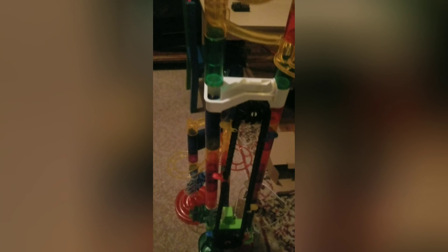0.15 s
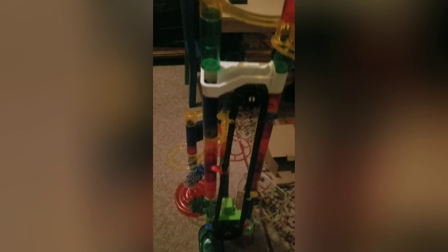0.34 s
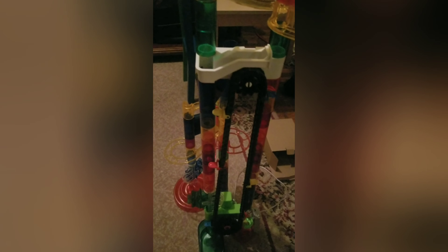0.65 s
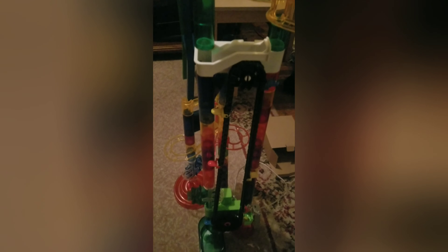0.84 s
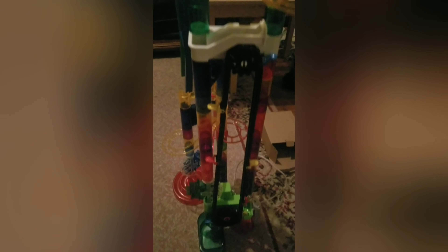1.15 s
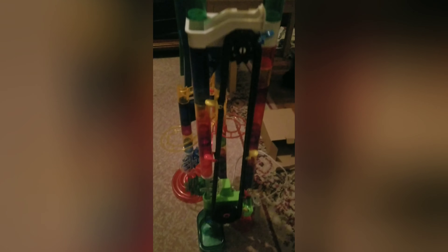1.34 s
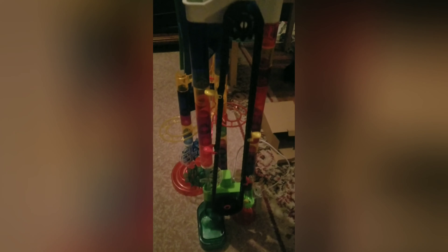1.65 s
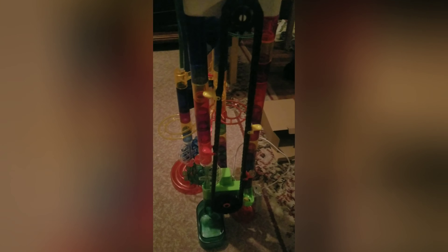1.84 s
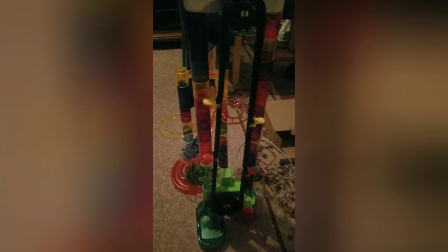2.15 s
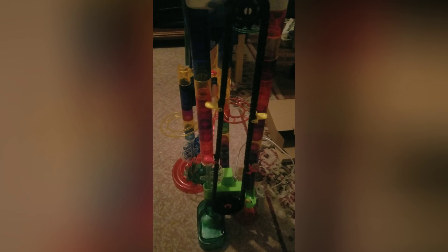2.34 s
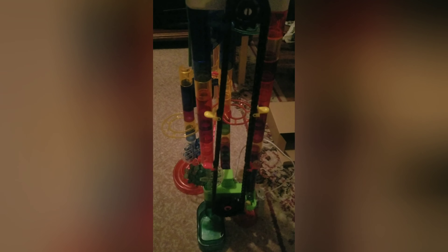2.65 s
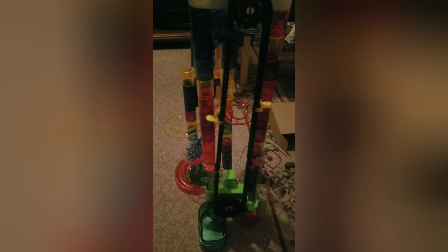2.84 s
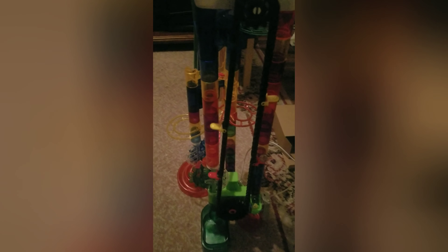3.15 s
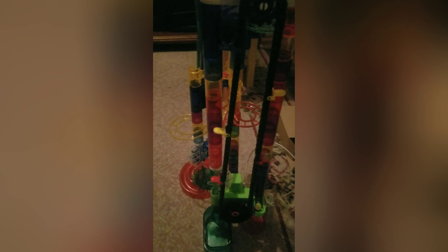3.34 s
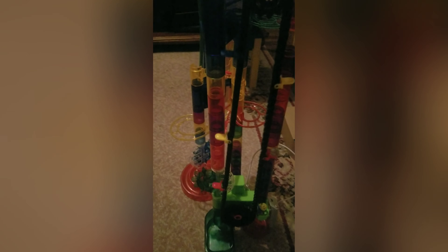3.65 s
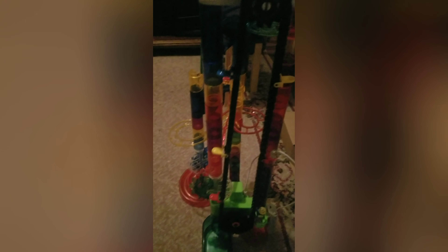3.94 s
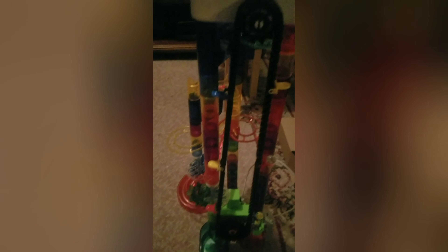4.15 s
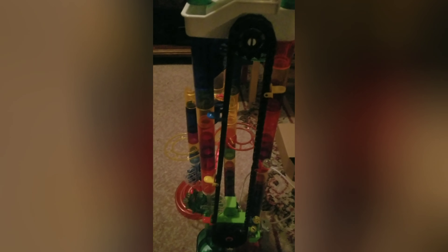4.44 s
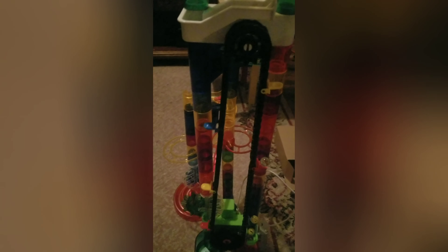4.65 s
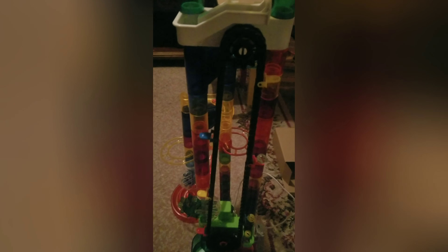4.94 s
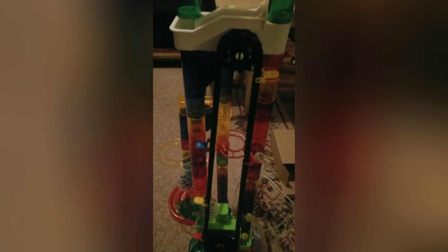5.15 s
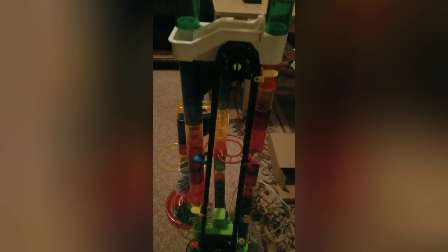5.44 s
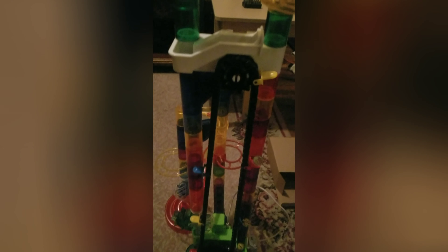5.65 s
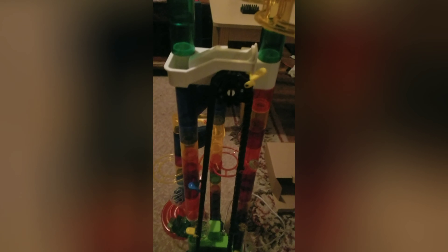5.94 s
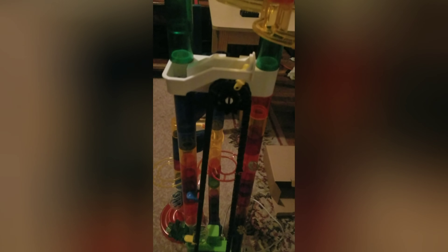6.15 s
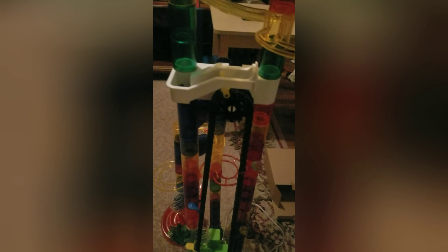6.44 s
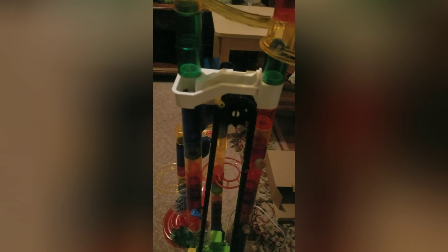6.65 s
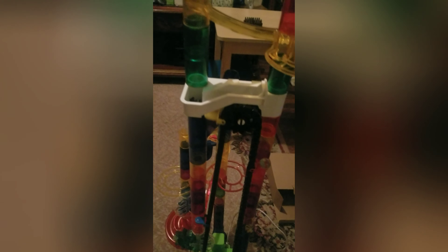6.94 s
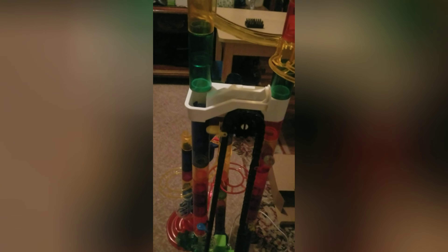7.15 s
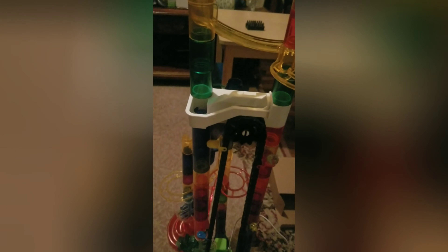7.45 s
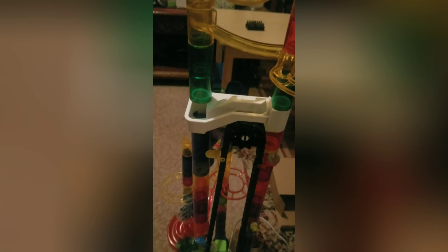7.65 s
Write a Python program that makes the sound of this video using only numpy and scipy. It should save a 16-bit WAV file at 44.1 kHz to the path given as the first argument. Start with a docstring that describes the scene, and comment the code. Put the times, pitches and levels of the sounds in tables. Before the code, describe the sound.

Marbles clatter and roll down a plastic toy tower in uneven bursts, with sharp bright clicks, close up, in a small room.

```python
"""Marbles drop and roll down a plastic toy tower, heard close through a hand-held microphone on the right.
Each knock is a burst of noise and short modes in three registers, followed by dying bounces and a jostle.
Between knocks, grains and noise make the rolling, lighter knocks tap the walls, gliding resonances circle
a funnel, high pips are marbles clicking together, and a chain lift ticks. Resonators ring the tower, echoes
and a noise tail make the room; low sine thuds of hand and stand, rumble, air and motor whirr lie beneath."""
import sys
import numpy as np
from scipy import signal
from scipy.fft import rfft, irfft
from scipy.io import wavfile

SR = 44100
rng = np.random.default_rng(int(sys.argv[2]) if len(sys.argv) > 2 else 0)


def bounce(signal):
    """Save signal as a 16-bit WAV file at the path given by the first command-line argument."""
    frames = np.transpose(np.atleast_2d(signal))
    limited = np.clip(frames, -1, 1)
    pcm = np.round(limited * 32767).astype(np.int16)
    wavfile.write(sys.argv[1], SR, pcm)


N = 343980
TIME = np.arange(N) / SR
RING = TIME[:3072]  # time axis of one short sound
ATTACK = 176  # samples over which a strike's level is set

# Marbles dropping onto plastic, levels before trims; the faint row at 4.648 s is instead a click of the chain
# lift, # a step ahead of its even run: # (time [s], hollow body [dB], clack [dB], bright tick [dB], decay time
# of the bounces [s])
MARBLE_DROPS = [(0.2054, -38, -33.0, -31.5, 0.024), (0.24, -25.5, -22.5, -24.5, 0.013),
                (0.2869, -29, -34, -32, 0.005), (0.314, -27, -25.0, -29.0, 0.013),
                (0.3792, -28.5, -37, -35, 0.0028), (0.429, -34, -38, -42, 0.065),
                (0.6801, -30.5, -24, -34.5, 0.0062), (0.723, -24, -21.5, -24.5, 0.018),
                (0.7884, -24, -17.5, -21.0, 0.0064), (0.8295, -28, -29, -31, 0.0044),
                (0.8415, -28.5, -26.0, -29, 0.011), (0.905, -31, -31.5, -42, 0.0027),
                (1.0284, -34, -34.5, -30, 0.0062), (1.1874, -28.5, -24.5, -26, 0.0035),
                (1.2286, -28.5, -25, -29.5, 0.0067), (1.306, -41, -38, -33.0, 0.019),
                (1.4012, -38.5, -28, -30.0, 0.018), (1.453, -29.5, -28, -27, 0.0031),
                (1.4877, -31, -32.5, -31.5, 0.004), (1.7706, -31, -26, -26.5, 0.024),
                (1.8313, -26.5, -21.0, -27, 0.0064), (1.902, -31.5, -25.5, -28, 0.02),
                (1.994, -25.5, -19.5, -24.5, 0.025), (2.0488, -29.5, -20, -25.5, 0.014),
                (2.1385, -28, -19.5, -23.5, 0.028), (2.163, -28.0, -23, -18.0, 0.02),
                (2.1853, -24, -26, -18, 0.004), (2.2376, -31, -25.5, -22, 0.039),
                (2.2831, -40, -24.0, -21, 0.0047), (2.3484, -25.5, -19, -17.5, 0.004),
                (2.3757, -28, -25, -21, 0.0036), (2.4078, -29, -23.5, -22.0, 0.0044),
                (2.482, -45, -31, -23.5, 0.0031), (2.532, -52, -46, -21.5, 0.0062),
                (2.5917, -32.0, -26.0, -19.5, 0.011), (2.6528, -33, -27.5, -23, 0.039),
                (2.7499, -27, -24, -27, 0.021), (2.7758, -26.5, -25.5, -22.0, 0.0081),
                (2.818, -32.5, -31.5, -28.5, 0.019), (2.9218, -27.0, -25, -24.5, 0.016),
                (3.0004, -33.5, -26.5, -29.5, 0.036), (3.043, -29.5, -26.5, -26.0, 0.0059),
                (3.1092, -27, -28.0, -26, 0.016), (3.1892, -33, -30, -29, 0.014),
                (3.207, -29.5, -28, -27.0, 0.0042), (3.253, -41, -34, -22, 0.0045),
                (3.3041, -29.5, -30, -24, 0.0055), (3.3412, -28, -23.5, -23, 0.018),
                (3.4397, -33, -31, -28, 0.018), (3.4953, -32.5, -29, -25.0, 0.03),
                (3.5723, -30.0, -30.0, -29.0, 0.016), (3.6001, -25.5, -22.5, -15, 0.0078),
                (3.7108, -30.0, -28, -20, 0.0017), (3.7654, -51, -41, -27, 0.016),
                (3.8001, -56, -39, -42.5, 0.0092), (3.9206, -24.5, -19.5, -24.5, 0.0019),
                (4.1116, -42.5, -52, -51, 0.034), (4.205, -27, -27.0, -25.0, 0.0025),
                (4.2491, -30, -25.5, -31.0, 0.0062), (4.3243, -44.0, -39, -38.5, 0.0047),
                (4.6482, -42, -46, -51, 0.016), (5.2283, -48, -60, -35.5, 0.0069),
                (5.2711, -39.0, -33.5, -40.0, 0.033), (5.303, -26.5, -22.0, -24.5, 0.026),
                (5.3802, -24.0, -21.5, -20.5, 0.024), (5.4699, -35.0, -30, -30, 0.064),
                (5.5359, -25, -24.5, -24.0, 0.017), (5.5578, -24.5, -21.5, -20, 0.013),
                (5.6176, -29.5, -26.0, -30.0, 0.01), (5.6661, -25, -23.0, -21, 0.019),
                (5.7273, -28.5, -28, -23, 0.015), (5.8137, -30.5, -29, -21, 0.0043),
                (5.868, -27.5, -24.0, -20.0, 0.0055), (5.9108, -28.5, -26, -22.5, 0.022),
                (5.9352, -33, -27, -20.0, 0.0035), (5.9853, -27.0, -21, -19, 0.0089),
                (6.0592, -27.0, -28, -16.5, 0.002), (6.108, -31.5, -32, -18.0, 0.0035),
                (6.1884, -44.0, -49, -39, 0.0035), (6.4638, -49, -49.0, -49, 0.03),
                (6.5778, -57, -48, -32.5, 0.012), (6.9369, -37.5, -32.0, -35.0, 0.0029),
                (6.9779, -29, -20.5, -27, 0.0048), (6.9876, -25, -20.5, -23, 0.0088),
                (7.1261, -32.5, -27.0, -30, 0.023), (7.1652, -28.0, -24, -17.5, 0.004),
                (7.1997, -29, -24.0, -21.0, 0.0044), (7.2555, -35, -35, -29.5, 0.051),
                (7.3018, -28.0, -22, -19, 0.016), (7.3726, -36, -39, -22.5, 0.0025),
                (7.4002, -28.5, -22.5, -20, 0.018), (7.4711, -32.5, -29, -25, 0.093),
                (7.5714, -29, -26, -21.0, 0.014), (7.6137, -27.5, -25, -17.5, 0.018)]
# Body, clack and tick registers of struck plastic: (low edge [Hz], high edge [Hz])
STRIKE_REGISTERS = [(150, 2400), (2400, 9000), (9000, 16000)]
# Relative colour of struck plastic: (frequency [Hz], density [dB per Hz])
PLASTIC_COLOUR = [(150, -18), (400, -16), (680, -10), (950, -10), (1250, -7.5), (1500, 1.5), (1750, -2.5),
                  (2150, 0.5), (3500, -1), (5500, -8), (8000, -8), (9400, -17.5), (11500, -5.5),
                  (13500, -14.5), (15500, -25)]
# The clack leans up or down about this pitch, by a share of the tick's lead over it.
CLACK_SPLIT_HZ, CLACK_TILT = 4500, 0.33
BOUNCES, BOUNCE_GAP_S = 5, .0078  # gap before jitter
BOUNCE_DB = -1  # against the knock, before the decay
ROUGH_TUMBLE_S = 0.027  # bounces decaying this slowly make the landing fully rough
ROUGH_SOFTER_DB = -1  # a rough landing spreads its force, so its first hit is softer

# How hard the marbles roll, before trims and the dips ahead of knocks: (time [s], level [dB])
ROLL_EFFORT = [(0.0, -47.5), (0.24, -45), (0.39, -41.5), (0.52, -43.5), (0.74, -43.5), (0.82, -43),
               (1.43, -41.5), (1.58, -42.5), (1.8, -49.5), (2.19, -32), (3.48, -38.5), (4.0, -42),
               (4.17, -51.5), (4.36, -58.5), (5.17, -52), (5.32, -53), (5.45, -38.5), (5.8, -40),
               (5.97, -35.5), (6.17, -53), (6.95, -59), (7.15, -34), (7.32, -37.5), (7.49, -42),
               (7.65, -50), (7.8, -56)]
# Relative colour of rolling: (frequency [Hz], density [dB per Hz])
ROLLING_COLOUR = [(150, -21), (400, -9), (700, -10), (1050, -6.5), (1550, -1.5), (1780, 0), (2100, -6),
                  (3000, -9.5), (5500, -13.5), (8000, -11.5), (9400, -14), (11500, -5), (13500, -9.5),
                  (15500, -6.5)]
ROLL_DB, BUSY_DB = -7, -38.5  # trim of the rolling; level of busy rolling
BRIGHTER_PER_DB = 0.1  # extra treble [dB] per dB above busy; slower rolling is duller
FALL_S, FALL_DB = .03, -6.5  # a falling marble touches nothing: the rolling sinks just before a knock
JOSTLE_DB, JOSTLE_S = -11.5, 0.03  # trim against the knock; shortest decay time, before the tumble adds
TAPS_PER_S, TAPS_THIN_DB_PER_DB = 50, 1.06  # rate at the busy level; slower rolling taps less often
TAP_DB, TAP_SPREAD_DB = 1.5, 4  # trim against the rolling effort; spread to either side

# A marble circling a funnel: (time [s], level [dB], lower resonance [Hz])
FUNNEL_GLIDE = [(4.3, -72, 1483), (4.7, -61.5, 1299), (5.2, -69.5, 1460), (6.2, -73, 1700),
                (6.42, -58, 1383), (6.6, -61.5, 1084), (6.87, -66.5, 1192), (7.0, -86, 1275)]
# Marble on marble: (time [s], level before trims [dB], pitch of first click [Hz], gap between clicks [s])
MARBLE_CLICKS = [(0.484, -27, 9900, 0.01), (0.527, -33, 10150, 0.0085), (0.9922, -27, 10250, 0.015),
                 (1.5842, -25.5, 10350, .018), (3.4148, -26, 10200, .0245), (4.024, -28, 9700, .0205)]
# Relative strength of the clicks in each run: (level [dB])
CLICK_RUN_DB = [-1, -7, -2.5]
PING_RISE = 0.026  # share of the first pitch added at each later click

# A faint, evenly spaced run of clicks from the chain lift
LIFT_START_S, LIFT_GAP_S, LIFT_CLICKS = 4.753, .1005, 4
# Register levels of a lift click, before the part's own trims: (body, clack, tick [dB])
LIFT_CLICK_DB = [-60, -52.5, -56]

# Sympathetic ringing of the whole tower: (resonance [Hz], relative level [dB])
TOWER_MODES = [(670, -1.5), (1196, -1.5), (1490, -10), (1595, 0), (1975, 2), (2186, 0), (2717, -37)]
TOWER_T60_S = .05
# Decay of the room's tail: (frequency [Hz], time to fall 60 dB [s])
ROOM_DECAY = [(300, 0.62), (1500, 0.37), (4000, 0.28), (11000, 0.21), (16000, 0.27)]

# Low thuds of the hand on the microphone and of the stand under heavy knocks:
# (time [s], level before trims [dB], pitch [Hz])
LOW_THUDS = [(0.165, -44, 55), (0.525, -33.5, 103), (0.612, -63, 70), (0.655, -36, 67), (1.079, -42, 131),
             (1.124, -46, 60), (1.297, -41.5, 55), (2.075, -40, 89), (2.180, -37, 150), (2.421, -31, 157),
             (3.132, -37.5, 90), (3.192, -31.5, 140), (3.650, -31, 168), (4.450, -34, 75.5),
             (4.478, -43, 80), (5.559, -41, 170), (5.684, -36, 70), (5.722, -38.5, 115), (7.212, -35, 100),
             (7.328, -33.5, 126), (7.617, -32, 126)]
# Shaking of the stand and floor, before trim and waver: (time [s], level [dB])
FLOOR_RUMBLE = [(0, -53), (2.2, -51.5), (5.3, -60.5), (5.7, -42), (5.85, -55.5), (6.35, -60), (6.9, -53),
                (7.6, -43.5), (7.8, -53.5)]
# Relative colour of that shaking: (frequency [Hz], density [dB per Hz])
FLOOR_COLOUR = [(12, -55), (20, -10), (65, 8.5), (300, -20.5), (390, -30), (660, -120)]
RUMBLE_WAVER_DB = 2.8
# Relative colour of the steady background, air and the lift motor's faint high whirr:
# (frequency [Hz], density [dB per Hz])
BACKGROUND_COLOUR = [(59, 2), (100, -37), (228, -26), (552, -10), (727, -2), (956, -8), (1290, -11),
                     (1880, -21), (2180, -5), (2870, -31), (5400, -57), (9340, -25), (10800, -7),
                     (12300, -25), (15500, -40)]
BACKGROUND_DB = -58.5  # before trims
# Relative hiss of the idle left channel: (frequency [Hz], density [dB per Hz])
HISS_COLOUR = [(70, 2), (400, -11.5), (3000, -16.5), (9000, -30), (15000, -5)]
CUTOFF_HZ = 15800


def from_db(db):
    """Decibels to gain."""
    return 10 ** (np.asarray(db) / 20)


def rms_one(x):
    """Scale to unit rms."""
    return x / np.sqrt(np.mean(x ** 2) + 1e-20)


def in_time(rows):
    """Draw each column of a curve at every sample."""
    s, *columns = np.transpose(rows)
    return [np.interp(TIME, s, column) for column in columns]


def at_hz(points, hz):
    """Read a table on a log-frequency axis."""
    f, value = np.transpose(points)
    return np.interp(np.log(hz + 1e-9), np.log(f), value)


def band(x, low_hz, high_hz, order=3):
    """Causal band-pass."""
    sos = signal.butter(order, [low_hz, high_hz], "band", fs=SR, output="sos")
    return signal.sosfilt(sos, x + 1e-18)


def coloured(x, spectrum, size=2048):
    """Minimum-phase filter with the given spectrum: nothing sounds early."""
    hz = np.arange(size // 2 + 1) * SR / size
    cepstrum = irfft(np.log(from_db(at_hz(spectrum, hz))))
    cepstrum[1:size // 2] *= 2
    cepstrum[size // 2 + 1:] = 0
    kernel = irfft(np.exp(rfft(cepstrum)))
    kernel = kernel.reshape((1,) * (x.ndim - 1) + (-1,))
    return signal.fftconvolve(x, kernel, axes=-1)[..., :x.shape[-1]]


def add(out, s, sound):
    """Mix a sound in at time s."""
    at = max(round(s * SR), 0)
    out[at:at + len(sound)] += sound[:N - at]


def drift(per_s):
    """Random wandering with an rms of 1, through the given number of knots per second."""
    knots = rng.standard_normal(int(TIME[-1] * per_s) + 2)
    return rms_one(np.interp(TIME * per_s, np.arange(len(knots)), knots))


def knocks(parts, graze_s, graze_db, jitter):
    """A marble grazes the wall, hits, then tumbles on in uneven, dying bounces, each on another part."""
    out = np.zeros(N)
    chance = rng.random((len(MARBLE_DROPS), BOUNCES + 2))
    for k, (s, *levels_db, tumble_s) in enumerate(MARBLE_DROPS):
        early, graze_force, *uneven = chance[k]
        roughness = min(tumble_s / ROUGH_TUMBLE_S, 1)
        graze = touch(parts[k - 1], levels_db) * from_db(graze_db)
        add(out, s - graze_s * (.5 + early), graze * roughness ** 2 * graze_force)
        add(out, s, touch(parts[k], levels_db) * from_db(ROUGH_SOFTER_DB * roughness))
        for n, late in enumerate(uneven):
            delay = BOUNCE_GAP_S * (n + 1 + jitter * (late - .5))
            force = from_db(BOUNCE_DB) * np.exp(-delay / tumble_s)
            add(out, s + delay, touch(parts[k - n - 2], levels_db) * force)
    return out


def touch(part, levels_db):
    """One contact excites body, clack and tick; a strong tick tilts the clack brighter, a weak one duller."""
    body, clack, tick = part
    body_db, clack_db, tick_db = levels_db
    lean_db = CLACK_TILT * (tick_db - clack_db)
    low = signal.lfilter(*signal.butter(1, CLACK_SPLIT_HZ, fs=SR), clack)
    clack = from_db(clack_db - lean_db) * low + from_db(clack_db + lean_db) * (clack - low)
    return from_db(body_db) * body + clack + from_db(tick_db) * tick


def plastic_parts():
    """Every part sounds different; the modes of its hollow body ring longest, those of its tick shortest."""
    low, middle, high = STRIKE_REGISTERS
    body = from_db(-2.5) * strikes(low, crack_s=0.002, chatter_s=.005, ring_s=0.011,
                                   ring_db=-5.5, mode_s=0.011)
    clack = from_db(-4.0) * strikes(middle, crack_s=0.00096, chatter_s=.004, ring_s=0.016,
                                    ring_db=-8.5, mode_s=0.0047)
    tick = from_db(-1.5) * strikes(high, crack_s=0.0014, chatter_s=.0035, ring_s=0.0074,
                                   ring_db=-14.5, mode_s=0.0032)
    return list(zip(body, clack, tick))


def strikes(register, crack_s, chatter_s, ring_s, ring_db, mode_s):
    """One response per part: a marble chatters three times in milliseconds and rings the part's own modes."""
    count = len(MARBLE_DROPS)
    decay = np.exp(-RING / crack_s) + from_db(ring_db) * np.exp(-RING / ring_s)
    for late, force in rng.random((count, 2, 2, 1)).transpose(1, 2, 0, 3):
        age = RING - chatter_s * late
        decay = decay + (0.5 + 0.58 * force) * (age > 0) * np.exp(-np.abs(age) / crack_s)
    struck = rng.standard_normal((count, len(RING))) * decay
    for hz in rng.uniform(*register, (count, 4)).T:
        mode = np.sin(2 * np.pi * hz[:, None] * RING) * np.exp(-RING / mode_s)
        struck += from_db(-15) * mode
    # each cavity has its own short round trip, which adds a series of broad resonances
    trip_s = rng.uniform(.0003, .0012, (count, 1))
    round_trip = np.exp(-2j * np.pi * np.fft.rfftfreq(len(RING), 1 / SR) * trip_s)
    reflection = rng.choice([-.3, .3], (count, 1))
    struck = irfft(rfft(struck) / (1 - reflection * round_trip))
    struck = band(coloured(struck, PLASTIC_COLOUR), *register)
    return struck / np.sqrt(np.mean(struck[:, :ATTACK] ** 2, axis=1, keepdims=True))


def rattle():
    """Marbles roll over seams and jostle in the chutes: a smooth rub when slow, more clatter when fast."""
    roll_db = rolling_db() + ROLL_DB
    jostle_body, jostle_bright = jostling(swell_s=.005, bright_db=-5.5)
    bright_roll_db = roll_db + BRIGHTER_PER_DB * (roll_db - BUSY_DB) - 5.0
    # rolling and jostling add as powers
    body_db = 10 * np.log10(from_db(roll_db) ** 2 + jostle_body)
    bright_db = 10 * np.log10(from_db(bright_roll_db) ** 2 + jostle_bright)
    clatter = np.clip((body_db + 54.5) / 18, .1, .9)
    bumpy = clatter * grains(per_s=200, spread_db=8.0, ring_s=0.0048)
    smooth = (1 - clatter) * rng.standard_normal(N)
    contacts = coloured(bumpy + smooth, ROLLING_COLOUR)
    body = from_db(body_db) * rms_one(band(contacts, 120, 6730, order=2))
    bright = from_db(bright_db) * rms_one(band(contacts, 4820, 12260, order=2))
    return body + bright


def rolling_db():
    """Level of the rolling: it sinks while a marble falls and is back as it lands."""
    falling = np.zeros(N)
    for s, *_ in MARBLE_DROPS:
        fall = slice(int((s - FALL_S) * SR), int(s * SR))
        falling[fall] = np.maximum(falling[fall], 1 - (s - TIME[fall]) / FALL_S)
    return in_time(ROLL_EFFORT)[0] + FALL_DB * falling


def jostling(swell_s, bright_db):
    """Marbles set moving by a knock: the power of a rattle that swells and dies, as body and bright part."""
    body, bright, t = np.zeros(N), np.zeros(N), TIME[:SR // 2]
    for s, body_db, clack_db, tick_db, tumble_s in MARBLE_DROPS:
        swell = 1 - np.exp(-t / swell_s)
        shape = from_db(JOSTLE_DB) * swell * np.exp(-t / (JOSTLE_S + tumble_s / 2))
        add(body, s, (from_db(body_db) * shape) ** 2)
        add(bright, s, (from_db(tick_db + bright_db) * shape) ** 2)
    return body, bright


def grains(per_s, spread_db, ring_s):
    """Tiny uneven contacts, each ringing briefly in one of eight noise responses; rms 1."""
    sizes = from_db(spread_db * np.minimum(rng.exponential(1, N), 2)) * rng.choice([-1, 1], N)
    clicks = sizes * (rng.random(N) < per_s / SR)
    responses = rng.standard_normal((8, len(RING))) * np.exp(-RING / ring_s)
    part = rng.integers(0, len(responses), N)
    out = np.zeros(N)
    for k, response in enumerate(responses):
        out += signal.oaconvolve(clicks * (part == k), response)[:N]
    return rms_one(out)


def taps(parts, colour_db):
    """Rolling marbles tap the walls at odd moments: the harder they roll, the more often and the louder."""
    out = np.zeros(N)
    roll_db = rolling_db()
    slots = 640  # at most one tap in each
    for k, (late, force, luck) in enumerate(rng.random((slots, 3))):
        at = int((k + late) / slots * N)
        per_s = TAPS_PER_S * from_db(TAPS_THIN_DB_PER_DB * (roll_db[at] - BUSY_DB))
        if luck < per_s * TIME[-1] / slots:
            tap_db = roll_db[at] + TAP_DB + TAP_SPREAD_DB * (2 * force - 1)
            add(out, at / SR, touch(parts[k % len(parts)], colour_db) * from_db(tap_db))
    return out


def funnel(knots_per_s, upper_ratio, upper_db):
    """Rolling excites two narrow resonances of the bowl that glide as the marble goes round."""
    db, hz = in_time(FUNNEL_GLIDE)
    phase = 2 * np.pi * np.cumsum(hz) / SR

    def resonance(p):
        """A wandering amplitude and phase widen the tone into a narrow band."""
        return drift(knots_per_s) * np.cos(p) + drift(knots_per_s) * np.sin(p)

    low, high = resonance(phase), resonance(upper_ratio * phase)
    return from_db(db) * rms_one(low + from_db(upper_db) * high)


def pings(swell_s, bounce_s, bounce_db):
    """Glass on glass: very high pips rise in pitch, each repeated by quick reflections inside the tube."""
    out = np.zeros(N)
    chances = rng.random((len(MARBLE_CLICKS), len(CLICK_RUN_DB), 6))
    envelope = RING / swell_s * np.exp(1 - RING / swell_s)
    for (s, db, hz, gap_s), chance in zip(MARBLE_CLICKS, chances):
        for n, click_db in enumerate(CLICK_RUN_DB):
            tone = np.sin(2 * np.pi * hz * (1 + n * PING_RISE) * RING)
            pip = envelope * tone * from_db(db + click_db + 9)
            add(out, s + n * gap_s, pip)
            for late in chance[n]:
                add(out, s + n * gap_s + bounce_s * late, pip * from_db(bounce_db * late))
    return out


def lift(parts):
    """Links of the chain lift click evenly, each with a slightly different sound."""
    out = np.zeros(N)
    for k in range(LIFT_CLICKS):
        add(out, LIFT_START_S + k * LIFT_GAP_S, touch(parts[k], LIFT_CLICK_DB))
    return out


def tower(shake):
    """The joined tubes ring on in their own modes, as two-pole resonators driven by the contacts."""
    out = np.zeros(N)
    r = from_db(-60 / (TOWER_T60_S * SR))  # decay per sample
    for hz, db in TOWER_MODES:
        w = 2 * np.pi * hz / SR
        feed = [(1 - r * r) / 2, 0, -(1 - r * r) / 2]
        out += from_db(db) * signal.lfilter(feed, [1, -2 * r * np.cos(w), r * r], shake + 1e-18)
    return out


def room(x, gap_s, early_s, early_db, tail_db):
    """Early echoes from the track and furniture, and a diffuse tail dying band by band."""
    t = TIME[:SR * 3 // 4]
    edges = np.geomspace(150, 17000, 9)
    tail = np.zeros(len(t))
    for low, high in zip(edges, edges[1:]):
        t60_s = at_hz(ROOM_DECAY, np.sqrt(low * high))
        tail += band(rng.standard_normal(len(t)), low, high) * from_db(-60 * t / t60_s)
    tail = tail * (1 - np.exp(-t / gap_s))
    echoes = rng.standard_normal(len(t)) * (rng.random(len(t)) < 900 / SR)  # about 900 per second
    early = echoes * np.exp(-t / early_s) * (t > .002)
    response = from_db(early_db) * early / np.linalg.norm(early)
    response += from_db(tail_db) * tail / np.linalg.norm(tail)
    return signal.fftconvolve(x, response)[:N]


def thuds(cycles, level_db):
    """The hand on the microphone, or the stand under a heavy knock: a low sine under a short, dying swell."""
    out = np.zeros(N)
    for s, db, hz in LOW_THUDS:
        age = RING * hz / cycles
        envelope = age * np.exp(1 - age)
        add(out, s, -from_db(db + level_db) * envelope * np.sin(2 * np.pi * hz * RING))
    return out


def rumble():
    """Shaking of the stand and floor: low noise under a drawn level that wavers by chance."""
    level_db = in_time(FLOOR_RUMBLE)[0] - 2.5 + RUMBLE_WAVER_DB * drift(9.9)
    return from_db(level_db) * steady_noise(FLOOR_COLOUR, size=16384)


def steady_noise(spectrum, size=2048):
    """Noise of one colour; rms 1."""
    return rms_one(coloured(rng.standard_normal(N), spectrum, size))


def scene():
    """Track, room and background on the right; the left holds only a trace of them and a faint hiss."""
    parts = plastic_parts()
    track = knocks(parts, graze_s=.006, graze_db=-8.5, jitter=.8)
    track += taps(parts, colour_db=[-1.5, 1.5, 0.5]) + lift(parts) + rattle()
    track += funnel(knots_per_s=520, upper_ratio=1.5, upper_db=-11.0)
    ringing = from_db(-2.0) * tower(track)
    track = track + ringing + pings(swell_s=0.00014, bounce_s=0.009, bounce_db=-13)
    heard = track + room(track, gap_s=0.00069, early_s=0.015, early_db=-13.5, tail_db=-10.5)
    background = from_db(BACKGROUND_DB - 4.0) * steady_noise(BACKGROUND_COLOUR)
    heard += rumble() + background + thuds(cycles=0.23, level_db=3.0)
    hiss = from_db(-68) * steady_noise(HISS_COLOUR)
    return np.stack([from_db(-45.0) * heard + hiss, from_db(5.5) * heard])


def record(dry):
    """A steep elliptic low-pass cuts the top."""
    return signal.sosfilt(signal.ellip(10, .2, 80, CUTOFF_HZ, fs=SR, output="sos"), dry)


dry = scene()
out = record(dry)
bounce(out)
```